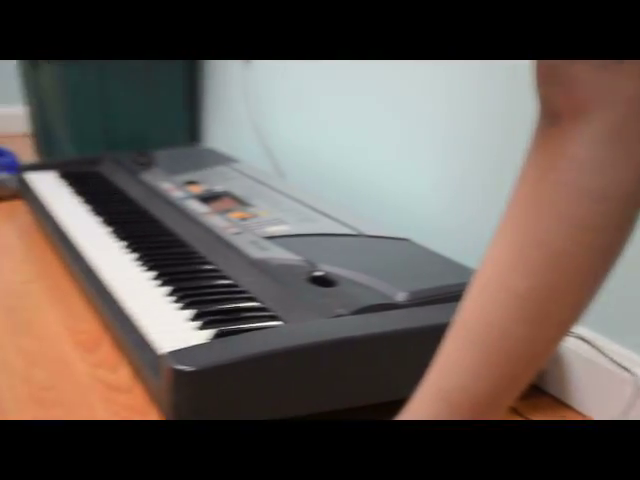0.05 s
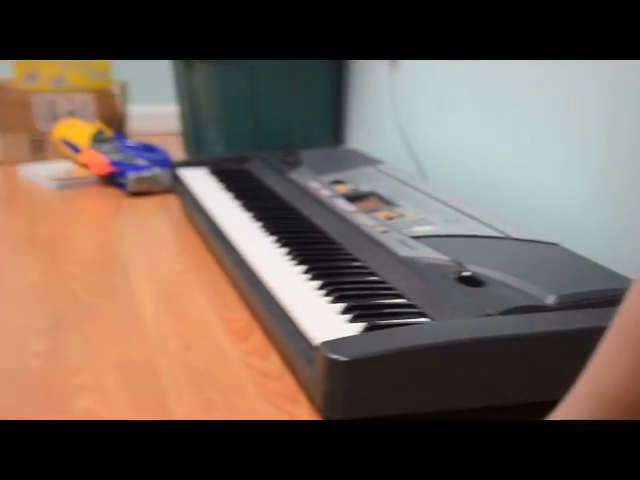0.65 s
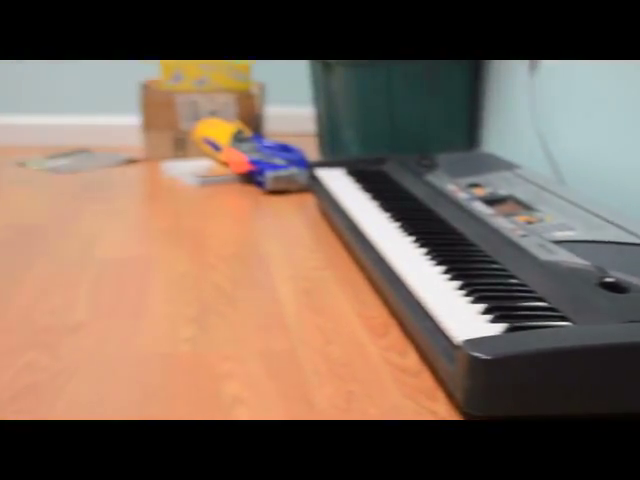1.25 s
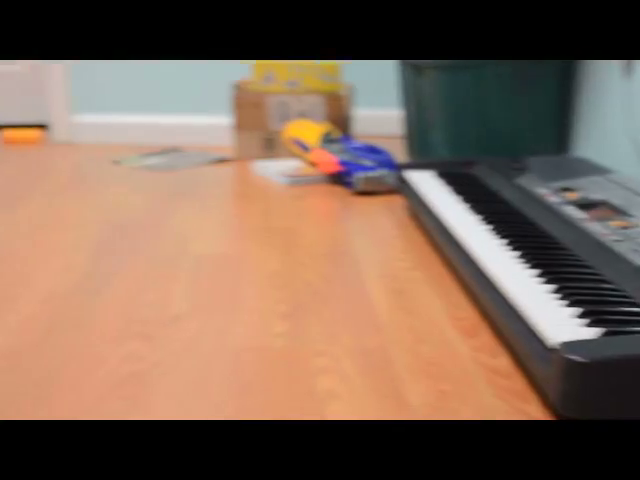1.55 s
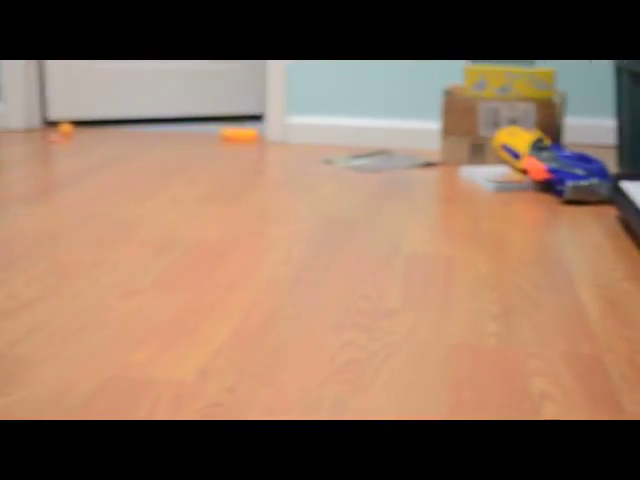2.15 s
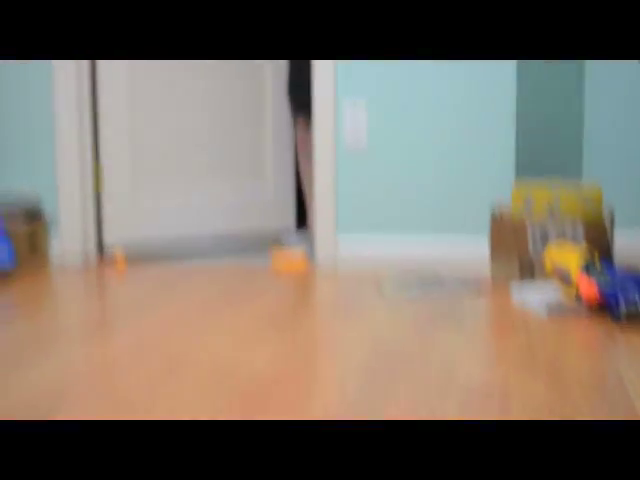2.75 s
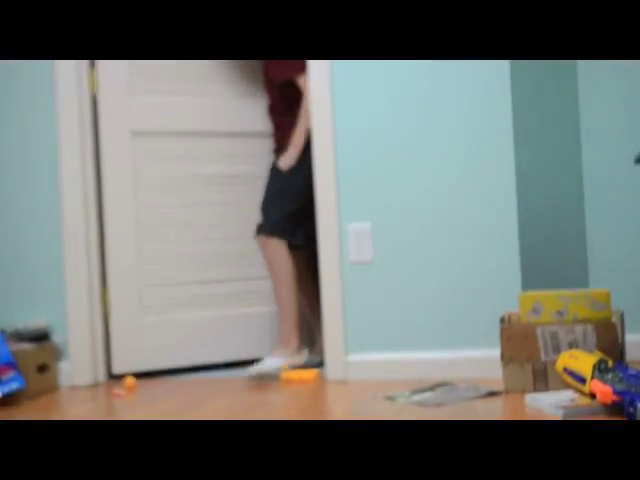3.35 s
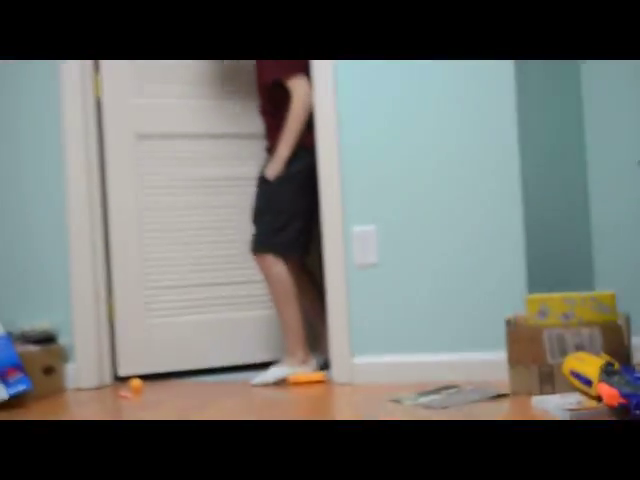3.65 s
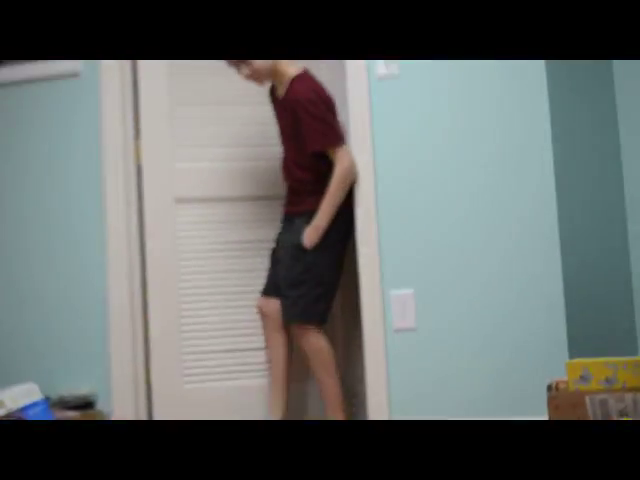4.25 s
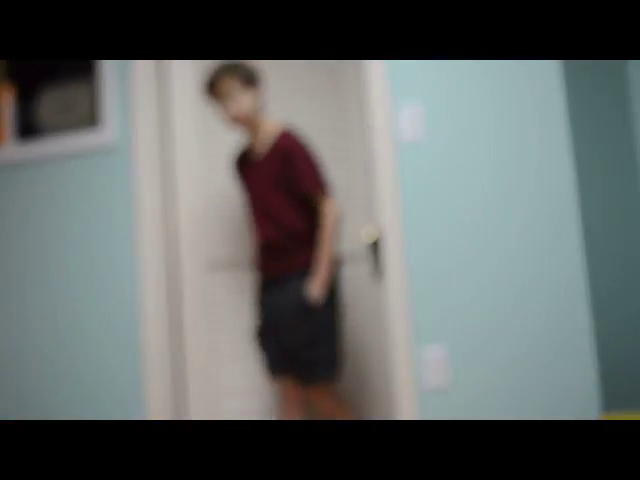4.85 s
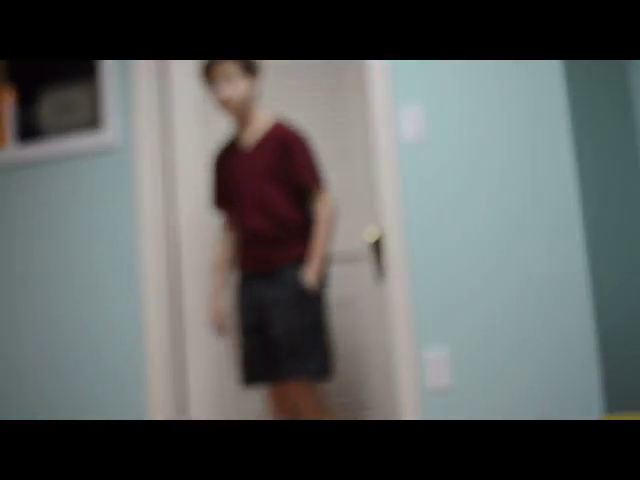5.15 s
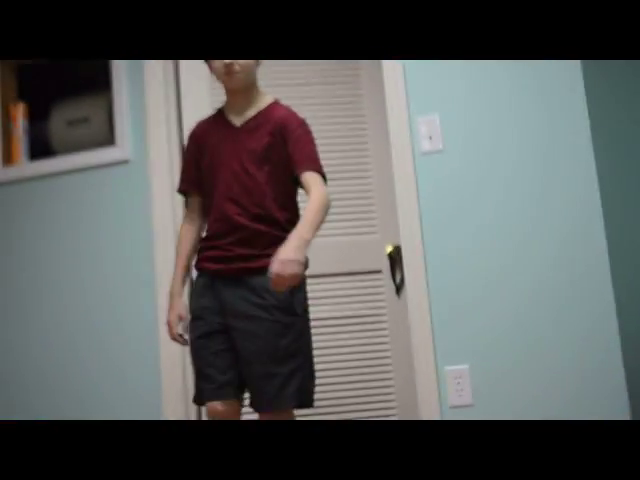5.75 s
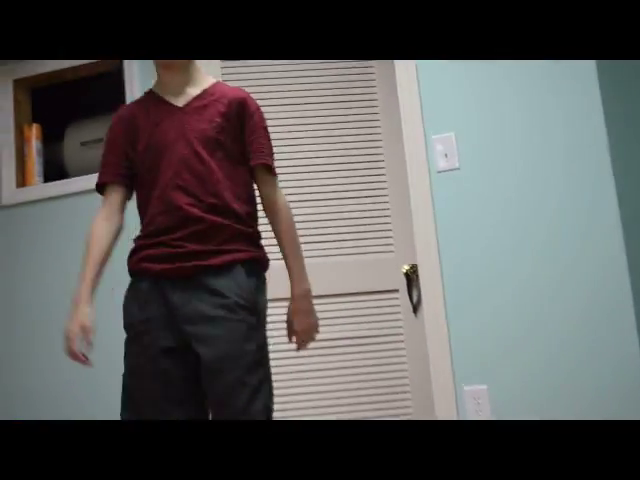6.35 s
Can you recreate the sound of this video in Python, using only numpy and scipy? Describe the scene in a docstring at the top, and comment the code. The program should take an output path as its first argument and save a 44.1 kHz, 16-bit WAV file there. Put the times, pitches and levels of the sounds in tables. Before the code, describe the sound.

Hollow plastic bumps on a wooden floor, then a louvered door clatters open and knocks shut, amid small camera ticks and faint hum.

```python
"""Plastic bumps and a louvered door

Small room, wooden floor. A hollow plastic thing is set down close by; the boards thud under it.
A louvered closet door clatters open, a foot lands, the door knocks shut: each blow rattles the slats
and rings the frame. A hand-held camera rustles; its lens ticks and whirs as it focuses.
Faint mains hum and hiss lie under it all."""
import sys
import numpy as np
from scipy import signal
from scipy.fft import rfft, irfft, next_fast_len
from scipy.io import wavfile

SR = 44100
rng = np.random.default_rng(int(sys.argv[2]) if len(sys.argv) > 2 else 0)


def store_pcm(level_fs):
    """Save levels as 16-bit WAV."""
    pcm = np.round(np.clip(level_fs, -1, 1) * 32767).astype(np.int16)
    wavfile.write(sys.argv[1], SR, np.atleast_2d(pcm).T)


N = 286958
EVENT_N = 2 ** 15
TIME_S, AGE_S = np.arange(N) / SR, np.arange(EVENT_N) / SR
BIN_HZ = np.maximum(np.arange(EVENT_N // 2 + 1) * SR / EVENT_N, 1)
TICK_MID_HZ = 900

# room decay: f/Hz, T60/s
ROOM_DECAY = [(100, 1), (400, 0.56), (1000, 0.34), (2500, 0.41), (6000, 0.32), (14000, 0.24)]
# mains harmonics: f/Hz, level/dB
MAINS_HARMONICS = [(120, -80), (240, -70.5), (360, -66.5), (480, -83.5)]
# room hiss: f/Hz, level/dB
HISS_SPECTRUM = [(25, -13), (55, -0.5), (90, 1.5), (150, 0.5), (500, -8.5), (900, -4.5), (2000, -7),
                 (3200, -15), (5000, -25), (12000, -28), (15500, -33)]
# hands and clothes rubbing, one list per stretch: t/s, level/dB
RUSTLE_LEVELS = [
    [(0.0, -65.5), (0.436, -57.5), (0.68, -64.5), (0.9, -62)],
    [(1.45, -65), (1.686, -57.5), (1.872, -50.5), (2.3, -59.5)],
    [(2.4, -56), (2.574, -55.5), (3.142, -59), (3.35, -57)],
    [(3.95, -66.5), (4.098, -59.5), (4.31, -59.5), (4.7, -53.5)],
    [(5.05, -57.5), (6.5, -58.5)],
]
# cloth friction: f/Hz, level/dB
CLOTH_SPECTRUM = [(80, -9.5), (200, 3), (500, 1), (900, 3), (1600, -4.5), (2800, -11.5), (5000, -23),
                  (12000, -38.5)]
# plastic on floor: t/s, level/dB, treble share/dB, board thud/dB
PLASTIC_BUMPS = [(0.946, -31, -13, -55), (1.004, -28, -16.5, -35.5), (1.02, -30, -13, -33),
                 (1.044, -27.5, -15.5, -33), (1.099, -27.5, -11.5, -39), (1.124, -20, -6, -35),
                 (1.144, -30, -25, -35), (1.185, -28, -18, -56), (1.446, -45, -15.5, -58),
                 (1.704, -34, -4.5, -54), (1.751, -37, -17, -66), (1.774, -50, -16, -42),
                 (1.846, -42.5, -4, -50.5), (2.55, -33.5, -23, -50)]
# plastic shell: f/Hz, level/dB
SHELL_SPECTRUM = [(59, -21), (100, -7.5), (201, -13.5), (362, -2), (403, -7), (668, -7.5), (727, -5.5),
                  (1210, -4.5), (2320, -10.5), (3120, -10), (4460, -21), (11500, -45.5), (15500, -52)]
# hard edges meeting: f/Hz, level/dB
SNAP_SPECTRUM = [(3000, -65), (6500, 5.5), (9500, 15), (12000, 9.5), (15500, -3)]
# floorboards: f/Hz, level/dB
BOARD_SPECTRUM = [(45, -22.5), (70, -9), (110, -10.5), (150, -8.5), (220, -15.5), (400, -35), (1000, -59)]
# footfalls: t/s, level/dB
FOOTFALLS = [(1.655, -50), (2.555, -48), (2.969, -55), (3.582, -33.5)]
# heel, sole, toe: t/s after heel, level/dB
HEEL_TO_TOE = [(0, -0.5), (0.021, -5.5), (0.072, -8)]
# plastic corners catching: t/s, level/dB
CORNER_CLICKS = [(0.956, -30), (1.021, -37), (1.045, -43), (1.061, -38), (1.124, -36)]
# two faint, very high tones, then lower metal pings: t/s, f/Hz, level/dB
PING_TONES = [(0.956, 15300, -68), (1.05, 15300, -69), (1.702, 1722, -43), (1.704, 3380, -52),
              (1.77, 10550, -65), (1.869, 14600, -74)]
# fingers on casing: peak t/s, half length/s, f/Hz, level/dB
FINGER_SCUFFS = [(1.955, 0.041, 7940, -75), (2.419, 0.011, 2100, -53.5), (2.511, 0.017, 3100, -54.5),
                 (2.538, 0.03, 1520, -50), (2.828, 0.032, 2300, -61.5), (3.818, 0.0016, 4770, -60),
                 (4.613, 0.034, 1560, -50.5), (6.408, 0.012, 2080, -56)]
# lens ticks: t/s, level/dB, ring f/Hz
LENS_TICKS = [(2.083, -28.5, 890), (2.113, -38, 623), (2.380, -34.5, 1390), (2.553, -28.5, 500),
              (2.582, -32.5, 590), (2.719, -32.5, 2120), (3.014, -32.5, 580), (3.088, -44, 1120),
              (4.046, -39, 950), (4.24, -34.5, 1040), (4.328, -36, 890), (4.343, -35, 740),
              (4.439, -33, 1030), (4.484, -43, 1400), (4.590, -31, 1570), (4.629, -28.5, 1070),
              (5.331, -26.5, 763), (5.412, -31, 910), (5.597, -35, 915), (5.680, -36, 864),
              (5.754, -34, 700), (5.806, -35, 836), (5.831, -39, 835), (5.909, -35.5, 750),
              (5.934, -39, 890), (6.004, -36.5, 950), (6.050, -30.5, 940), (6.066, -36, 890),
              (6.189, -33.5, 846), (6.232, -32, 493), (6.293, -33.5, 861), (6.448, -39, 890)]
# camera body: f/Hz, level/dB
CASING_SPECTRUM = [(150, -17.5), (400, -12), (600, 0.5), (900, 2.5), (1150, -1), (1500, -2), (2200, -13),
                   (3400, -21), (4800, -39.5), (9000, -49), (15000, -40)]
# focus motor runs: start t/s, end t/s, level/dB
FOCUS_RUNS = [(2.45, 2.64, -58.5), (2.614, 2.908, -63), (3.01, 3.096, -61), (3.61, 3.955, -59),
              (4.215, 4.404, -63.5), (4.461, 4.702, -57.5), (5.283, 5.48, -64), (5.744, 5.89, -67),
              (6.148, 6.525, -67)]
# lens drive: f/Hz, level/dB
MOTOR_SPECTRUM = [(300, 0), (1000, 11.5), (1900, 3.5), (2450, 2.5), (3000, 0), (3900, 1.5), (5200, -13.5),
                  (8500, -14.5), (11500, -12), (15000, -20)]
# door blows and slat rebounds: t/s, level/dB, treble share/dB
DOOR_BLOWS = [(3.409, -24, -17), (3.428, -15.5, -11.5), (3.431, -9.5, -16), (3.462, -4, -8),
              (3.467, -10, -9.5), (3.480, -11.5, -11.5), (3.491, -27, 4), (3.675, -28.5, -8),
              (4.753, -15.5, -16.5), (4.759, -18, -10.5), (4.794, -17.5, -14.5), (4.818, -20, -21)]
# dense slat resonances: f/Hz, level/dB
SLAT_SPECTRUM = [(200, -26.5), (320, -16), (430, -7.5), (520, -8), (700, -13), (850, -6.5), (1130, -6.5),
                 (1450, -9), (1950, -6.5), (2300, -3.5), (2900, -15), (4200, -21.5), (8000, -33.5),
                 (15500, -52)]
# frame modes, struck at two places: f/Hz, opening level/dB, shutting level/dB
FRAME_MODES = [(410, -14, -11), (428, -11, -14), (605, -12, -10), (816, -6, -2), (851, -9, 0),
               (878, -3, -10), (1022, -3, 0), (1082, -4, -6), (1118, 0, 0), (1195, -5, -10), (1263, -2, -6),
               (1303, -3, -13), (1380, -4, -16), (1472, -5, -16), (1602, -7, -5), (1785, -7, -13),
               (1873, -11, -13), (2110, -7, -15), (2184, -2, -17), (2259, -4, -18), (2334, -4, -25),
               (2505, -11, -15), (2999, -13, -20), (3214, -21, -26)]
# frame-to-room radiation: f/Hz, level/dB
FRAME_RADIATION = [(420, 0), (600, -3), (850, -1.5), (1100, -1), (1500, -2), (2250, -2), (3100, 2.5)]


def from_db(db):
    """Decibels to gain."""
    return 10 ** (np.asarray(db) / 20)


def unit(x):
    """Scale to energy 1."""
    return x / np.sqrt(np.sum(x ** 2) + 1e-20)


def at_hz(points, hz):
    """Read a table on a log-frequency axis."""
    known_hz, values = np.transpose(points)
    return np.interp(np.log(hz), np.log(known_hz), values)


def bell(centre_hz, width_oct):
    """Hump of height 1 on the log-frequency axis."""
    return np.exp(-(np.log2(BIN_HZ / centre_hz) / width_oct) ** 2)


def fade(t60_s):
    """Exponential decay."""
    return np.exp(-np.log(1000) * AGE_S / max(t60_s, 1e-3))


def add(out, t_s, sound):
    """Mix an event in at t_s."""
    start = max(round(t_s * SR), 0)
    out[start:start + EVENT_N] += sound[:N - start]


def high_passed(x, hz):
    """Fourth-order bass cut."""
    return signal.sosfilt(signal.butter(4, hz, "high", fs=SR, output="sos"), x)


def coloured(x, gain_db):
    """Minimum-phase filter: a body rings after the contact, never before."""
    cepstrum = irfft(np.log(from_db(gain_db)))
    cepstrum[1:EVENT_N // 2] *= 2
    cepstrum[EVENT_N // 2 + 1:] = 0
    return irfft(rfft(x) * np.exp(rfft(cepstrum)))


def shelved_db(spectrum, bass_db, treble_db):
    """Body spectrum, mean power 1, shelved toward the given bass and treble shares."""
    body_db = at_hz(spectrum, BIN_HZ)
    power = unit(from_db(body_db)) ** 2
    low_db = bass_db - 10 * np.log10(power[BIN_HZ < 600].sum())
    high_db = treble_db - 10 * np.log10(power[BIN_HZ > 1900].sum())
    shelf_db = at_hz([(520, low_db), (780, 0.013), (1400, 0), (2100, high_db)], BIN_HZ)
    return 20 * np.log10(unit(from_db(body_db + shelf_db)) * np.sqrt(len(BIN_HZ)))


def steady_noise(spectrum):
    """Noise, rms 1, shaped by rows of f/Hz, level/dB."""
    size = next_fast_len(N, True)
    hz = np.maximum(np.arange(size // 2 + 1) * SR / size, 1)
    shaped = rfft(rng.standard_normal(size)) * from_db(at_hz(spectrum, hz))
    return np.sqrt(N) * unit(irfft(shaped, size)[:N])


def room_tail(build_s=0.0029):
    """Diffuse reflections: quick build-up, treble dies first."""
    white, tail = rfft(rng.standard_normal(EVENT_N)), 0
    centres_hz, t60s_s = np.transpose(ROOM_DECAY)
    for share, t60_s in zip(np.eye(len(centres_hz)), t60s_s):
        band = np.interp(np.log(BIN_HZ), np.log(centres_hz), share)
        tail += irfft(white * band) * fade(t60_s)
    return unit(tail * (1 - np.exp(-AGE_S / build_s)))


def contact(crack_t60_s, chatter_t60_s, chatter_db, room_db):
    """Short crack, dying spray of smaller touches, room tail."""
    crack = unit(rng.standard_normal(EVENT_N) * fade(crack_t60_s))
    spray = rng.standard_normal(EVENT_N) * (rng.random(EVENT_N) < .08)
    chatter = unit(spray * fade(chatter_t60_s))
    return unit(crack + from_db(chatter_db) * chatter + from_db(room_db) * room_tail())


def room_tone(waver_db=3.0, hiss_db=-66):
    """Wavering mains harmonics over soft hiss."""
    hum = 0
    for hz, level_db in MAINS_HARMONICS:
        waver = steady_noise([(1, -41), (4, 19), (20, -60), (200, -115)])
        tone = np.sqrt(2) * np.sin(2 * np.pi * (hz * TIME_S + rng.random()))
        hum += from_db(level_db + waver_db * waver) * tone
    return hum + from_db(hiss_db) * steady_noise(HISS_SPECTRUM)


def rustle(gain_db=-3.5, flutter_db=3.0):
    """Hands and clothes catch and slip, so the level flutters."""
    t_s, level_db = np.vstack(RUSTLE_LEVELS).T
    catching = steady_noise([(5, 23), (60, -7.5), (300, -27), (1000, -89)])
    envelope_db = np.interp(TIME_S, t_s, level_db) + gain_db + flutter_db * catching
    return from_db(envelope_db) * steady_noise(CLOTH_SPECTRUM)


def plastic_bumps(gain_db=20.0, treble_lift_db=4.0, snap_db=-6):
    """Hollow plastic settles on the floor; brighter bumps snap more."""
    out = np.zeros(N)
    for t_s, level_db, treble_db, _ in PLASTIC_BUMPS:
        touch = contact(crack_t60_s=0.037, chatter_t60_s=0.057, chatter_db=-1.0, room_db=3.5)
        shell_db = shelved_db(SHELL_SPECTRUM, bass_db=-9.5, treble_db=treble_db + treble_lift_db)
        add(out, t_s, from_db(level_db + gain_db) * unit(coloured(touch, shell_db)))
        add(out, t_s, from_db(level_db + treble_db + snap_db) * snap())
    return out


def snap():
    """Bright edge of a hard blow."""
    touch = contact(crack_t60_s=0.041, chatter_t60_s=0.18, chatter_db=-43.0, room_db=-4.0)
    return unit(coloured(touch, at_hz(SNAP_SPECTRUM, BIN_HZ)))


def thud(deep_db, deep_hz=63, rise_s=0.0041):
    """A soft, heavy contact moves only the boards' low resonances."""
    touch = contact(crack_t60_s=0.02, chatter_t60_s=0.05, chatter_db=8.5, room_db=-6.0)
    boards = coloured(touch, at_hz(BOARD_SPECTRUM, BIN_HZ) + deep_db * bell(deep_hz, 0.29))
    return unit(boards * (1 - np.exp(-AGE_S / rise_s)))


def floor_thuds(gain_db=22.0, board_lag_s=0.007):
    """Boards give way just after each bump and under each rolling step."""
    out = np.zeros(N)
    for t_s, _, _, thud_db in PLASTIC_BUMPS:
        add(out, t_s + board_lag_s, from_db(thud_db) * thud(deep_db=-25))
    for t_s, level_db in FOOTFALLS:
        for lag_s, roll_db in HEEL_TO_TOE:
            add(out, t_s + lag_s, from_db(level_db + roll_db) * thud(deep_db=-1.5))
    return from_db(gain_db) * out


def corner_clicks():
    """Plastic corners catch: snap, no body."""
    out = np.zeros(N)
    for t_s, level_db in CORNER_CLICKS:
        add(out, t_s, from_db(level_db) * snap())
    return out


def pings(t60_s=0.17):
    """Two faint, thin, very high tones just after bumps; the lower pings are metal, one mode each."""
    out = np.zeros(N)
    for t_s, hz, level_db in PING_TONES:
        add(out, t_s, from_db(level_db) * np.sin(2 * np.pi * hz * AGE_S) * fade(t60_s))
    return out


def finger_scuffs(hump_db=41.0, width_oct=1.0):
    """Skin and nails slide on the casing: brief swells of friction noise."""
    out = np.zeros(N)
    mid_s = AGE_S.mean()
    for t_s, half_s, hz, level_db in FINGER_SCUFFS:
        white = rng.standard_normal(EVENT_N)
        friction = np.sqrt(EVENT_N) * unit(coloured(white, hump_db * bell(hz, width_oct)))
        swell = np.exp(-((AGE_S - mid_s) / half_s) ** 2 / 2)
        add(out, t_s - mid_s, from_db(level_db) * swell * friction)
    return out


def tick(ring_hz, ring_db=7.0):
    """Near-dry tick through the camera body; the higher, the thinner and shorter."""
    pitch_oct = np.log2(ring_hz / TICK_MID_HZ)
    body_db = shelved_db(CASING_SPECTRUM, bass_db=-10 - 11.5 * pitch_oct, treble_db=-8.5 + 2 * pitch_oct)
    crack_t60_s = 0.026 * 2 ** (-0.32 * pitch_oct)
    touch = contact(crack_t60_s, chatter_t60_s=0.17, chatter_db=-12.0, room_db=-14.0)
    return unit(coloured(touch, body_db + ring_db * bell(ring_hz, 0.21)))


def lens_ticks(gain_db=15.0, faint_count=12, faint_from_s=2.6, faint_db=-46.5, low_cut_hz=76):
    """The lens hunts for focus: clear ticks, fainter ones at random between."""
    out = np.zeros(N)
    for t_s, level_db, ring_hz in LENS_TICKS:
        add(out, t_s, from_db(level_db) * tick(ring_hz))
    for when, pitch in rng.random((faint_count, 2)):
        t_s = faint_from_s + when * (TIME_S[-1] - faint_from_s)
        add(out, t_s, from_db(faint_db) * tick(TICK_MID_HZ * 2 ** (pitch - .5)))
    return high_passed(from_db(gain_db) * out, low_cut_hz)


def focus_motor(ramp_s=0.038, flutter_db=4.0, grit_per_s=220, grit_db=-10.5):
    """The lens drive hisses in short runs; its gears flutter and crackle."""
    drive = 0
    for start_s, end_s, level_db in FOCUS_RUNS:
        inside_s = np.minimum(TIME_S - start_s, end_s - TIME_S)
        drive += from_db(level_db) * np.clip(inside_s / ramp_s, 0, 1)
    flutter = steady_noise([(5, -22), (25, -6), (70, -7), (300, -16), (1000, -80)])
    teeth = rng.uniform(-1.4, 1, N) * (rng.random(N) < grit_per_s / SR)
    tooth_ring = coloured(signal.unit_impulse(EVENT_N), at_hz(MOTOR_SPECTRUM, BIN_HZ))
    grit = np.sqrt(N) * unit(signal.fftconvolve(teeth, tooth_ring)[:N])
    whir = from_db(flutter_db * flutter) * steady_noise(MOTOR_SPECTRUM)
    return drive * (whir + from_db(grit_db) * grit)


def door_slats(gain_db=17.0, treble_lift_db=2.0, low_cut_hz=210):
    """Each blow shakes the loose slats, too light to radiate bass."""
    out = np.zeros(N)
    for t_s, level_db, treble_db in DOOR_BLOWS:
        # stronger blow, shorter contact: less bass, more snap
        bass_db = -24.5 - 0.39 * level_db
        snap_db = 8.5 + 3 * level_db + treble_db
        touch = contact(crack_t60_s=0.027, chatter_t60_s=0.26, chatter_db=-3.0, room_db=-2.0)
        wood = unit(coloured(touch, shelved_db(SLAT_SPECTRUM, bass_db, treble_db + treble_lift_db)))
        add(out, t_s, from_db(level_db + gain_db) * wood + from_db(snap_db) * snap())
    return high_passed(out, low_cut_hz)


def door_frame(open_gain_db=-17.5, shut_gain_db=-13.0, shut_from_s=4.2, attack_s=0.002, low_cut_hz=180):
    """Each blow adds energy to the frame's modes; higher ones lose it sooner."""
    out = np.zeros(N)
    blows_s, level_db, _ = np.transpose(DOOR_BLOWS)
    for hz, open_db, shut_db in FRAME_MODES:
        mode_db = np.where(blows_s < shut_from_s, open_db + open_gain_db, shut_db + shut_gain_db)
        strengths = from_db(level_db + mode_db + at_hz(FRAME_RADIATION, hz))
        ring = fade(t60_s=0.26 * (1000 / hz) ** 0.036) * (1 - np.exp(-AGE_S / attack_s))
        energy = np.zeros(N)
        for t_s, strength in zip(blows_s, strengths):
            add(energy, t_s, (strength * ring) ** 2)
        out += np.sqrt(energy) * np.sin(2 * np.pi * (hz * TIME_S + rng.random()))
    return high_passed(out, low_cut_hz)


def scene():
    """Room and camera sounds at one microphone."""
    door = door_slats() + door_frame()
    room = door + plastic_bumps() + corner_clicks() + floor_thuds() + pings() + room_tone()
    camera = lens_ticks() + focus_motor() + rustle() + finger_scuffs()
    return (room + camera)[None]


def record(dry):
    """Converter: steep top cut, tiny DC offset."""
    cutoff_hz, dc_offset = 15520, .0006
    return signal.sosfilt(signal.ellip(10, .1, 80, cutoff_hz, fs=SR, output="sos"), dry) + dc_offset


dry = scene()
out = record(dry)
store_pcm(out)
```